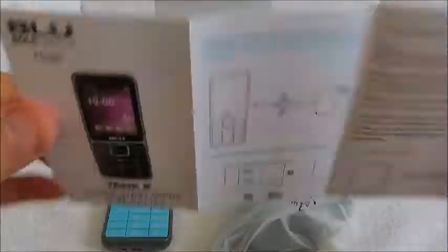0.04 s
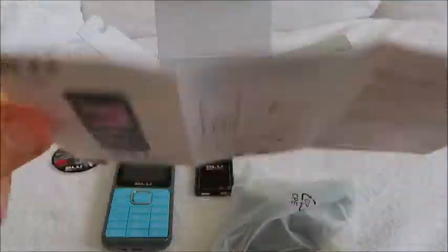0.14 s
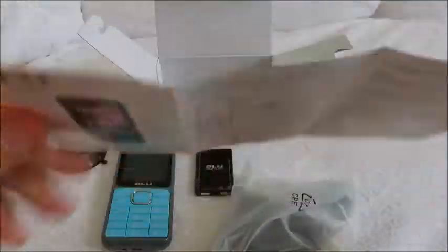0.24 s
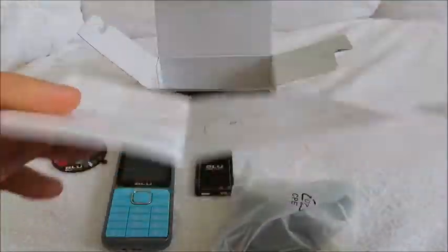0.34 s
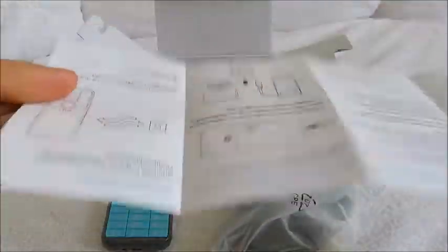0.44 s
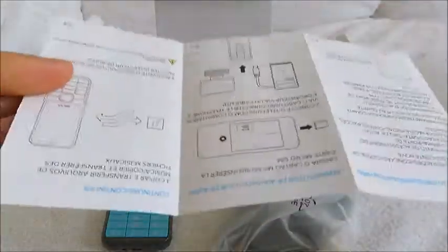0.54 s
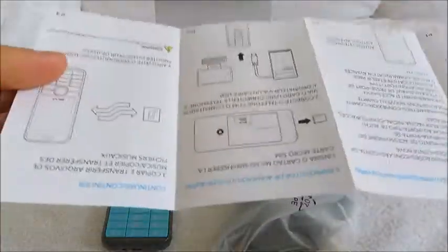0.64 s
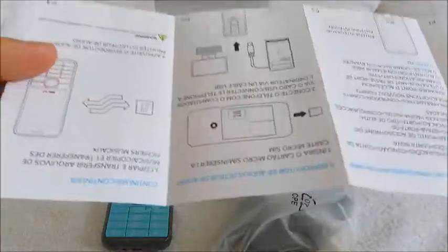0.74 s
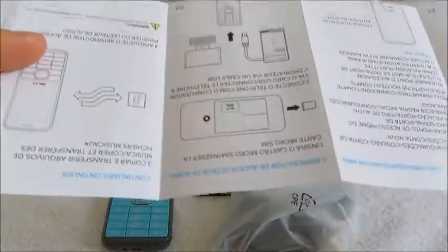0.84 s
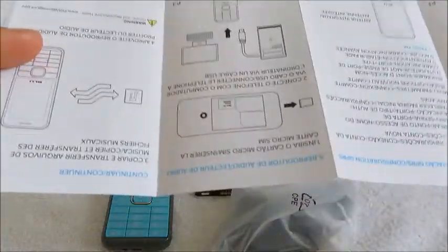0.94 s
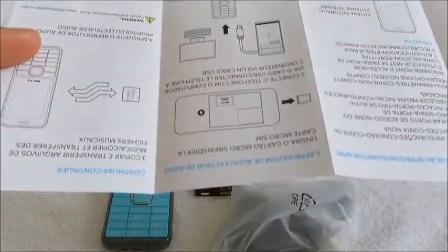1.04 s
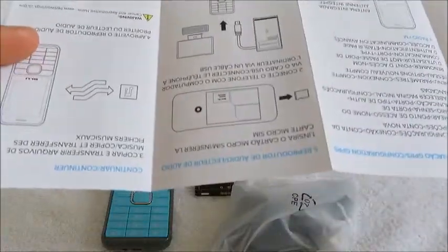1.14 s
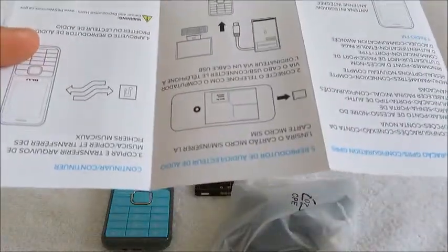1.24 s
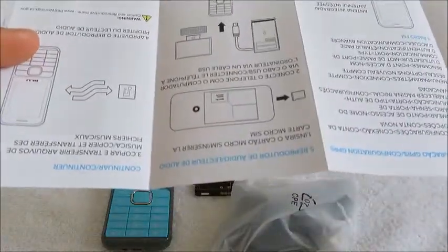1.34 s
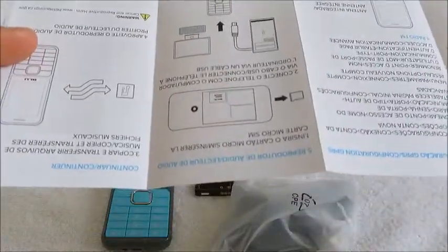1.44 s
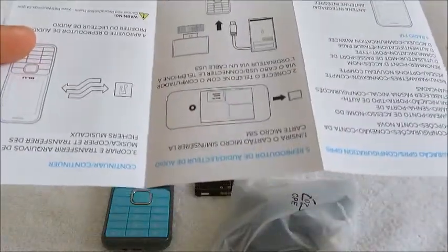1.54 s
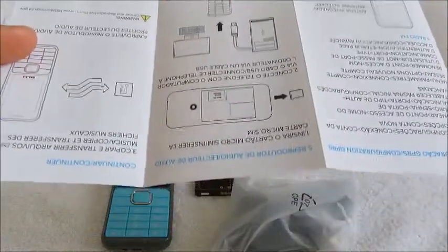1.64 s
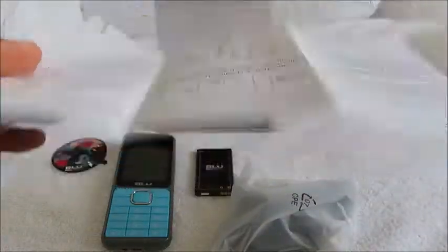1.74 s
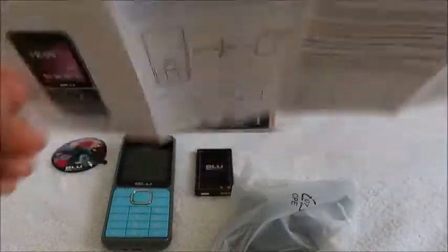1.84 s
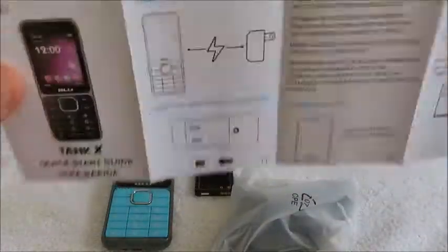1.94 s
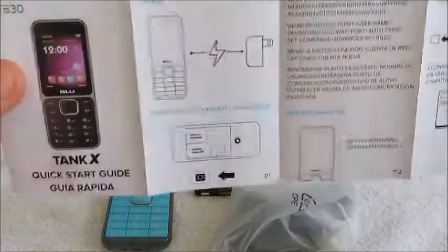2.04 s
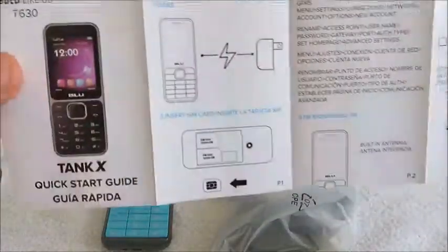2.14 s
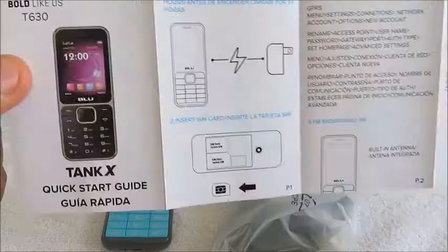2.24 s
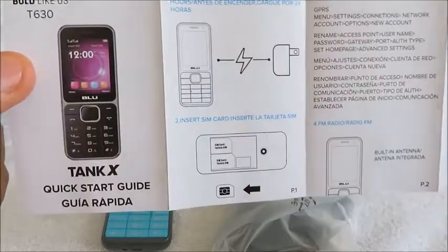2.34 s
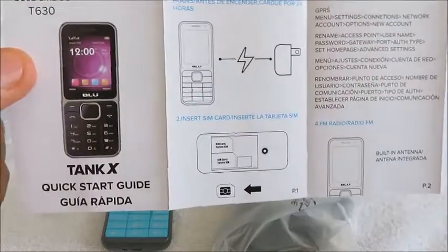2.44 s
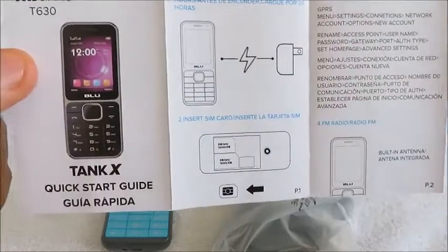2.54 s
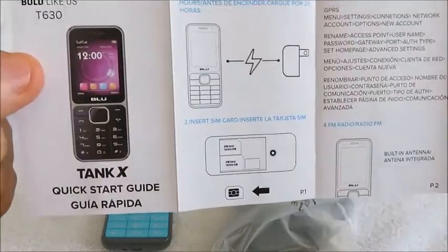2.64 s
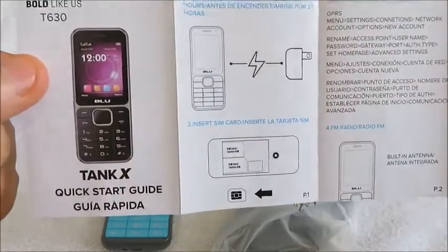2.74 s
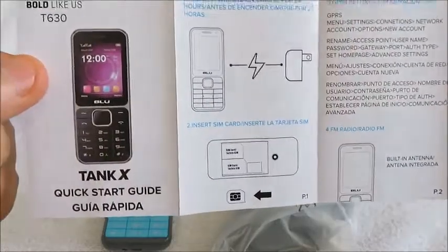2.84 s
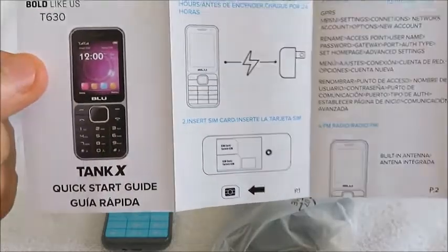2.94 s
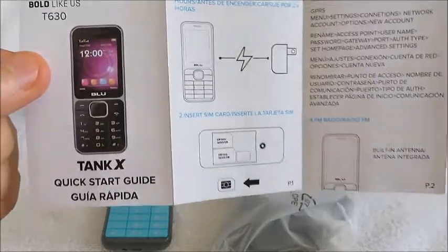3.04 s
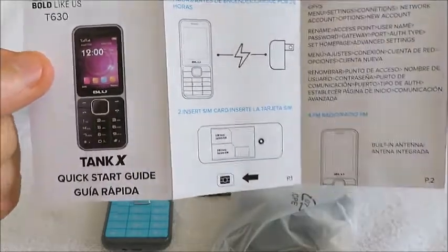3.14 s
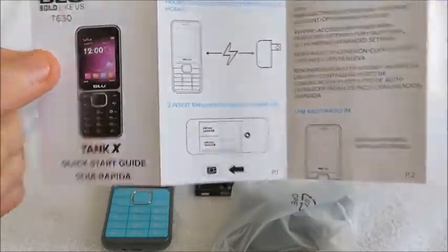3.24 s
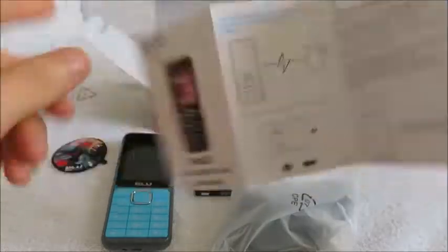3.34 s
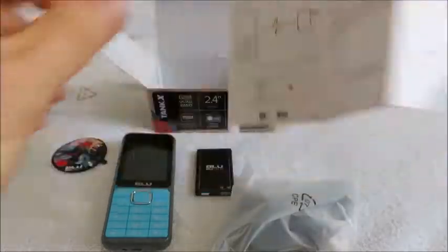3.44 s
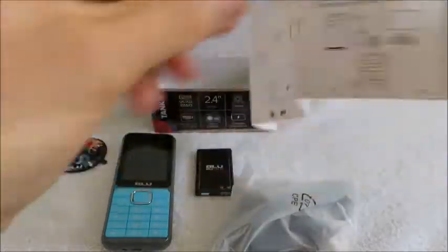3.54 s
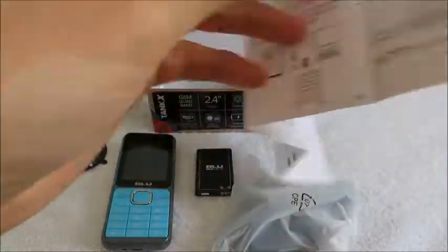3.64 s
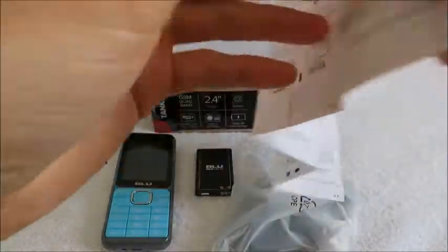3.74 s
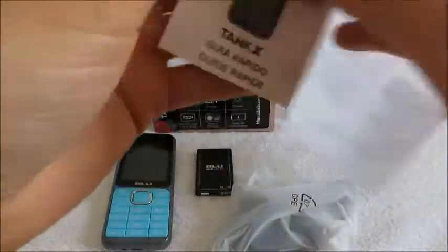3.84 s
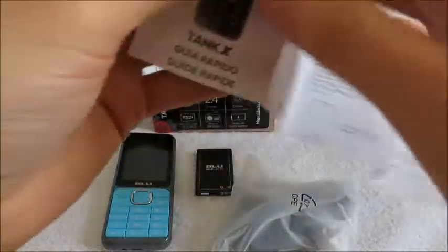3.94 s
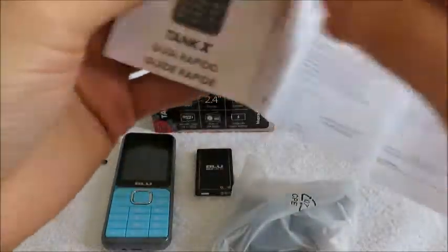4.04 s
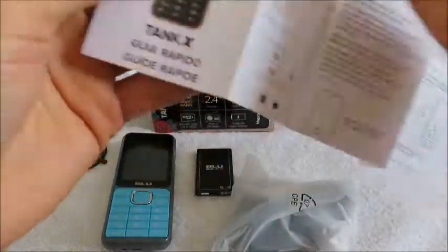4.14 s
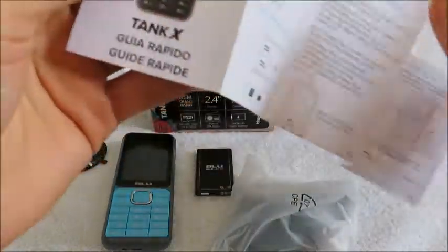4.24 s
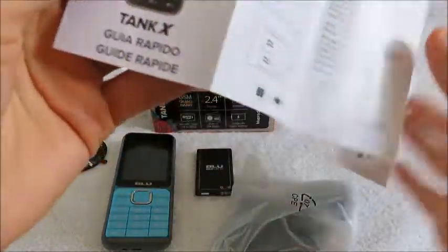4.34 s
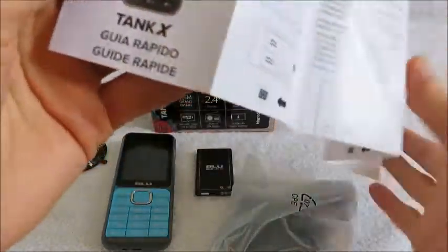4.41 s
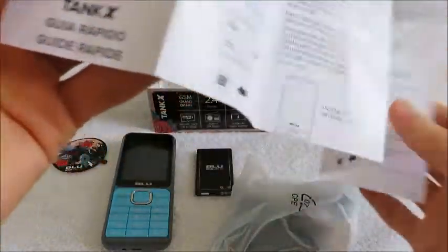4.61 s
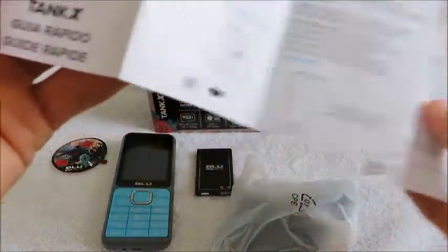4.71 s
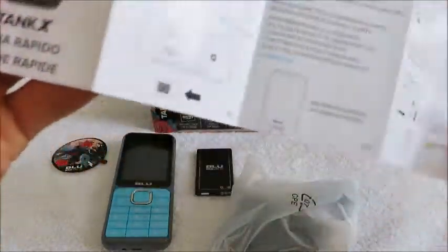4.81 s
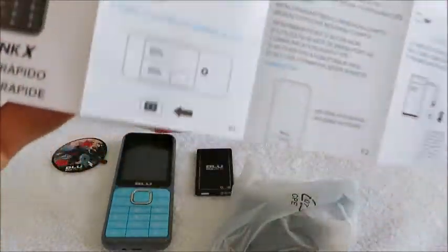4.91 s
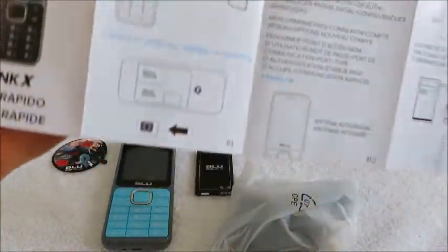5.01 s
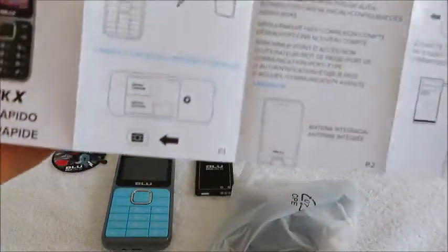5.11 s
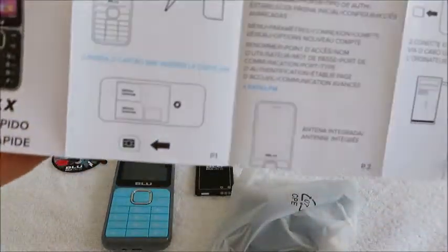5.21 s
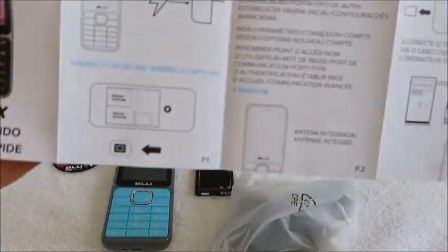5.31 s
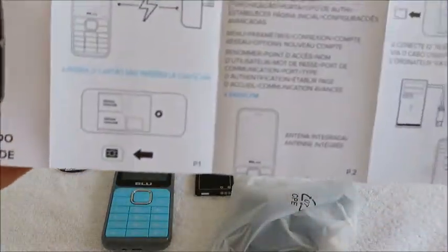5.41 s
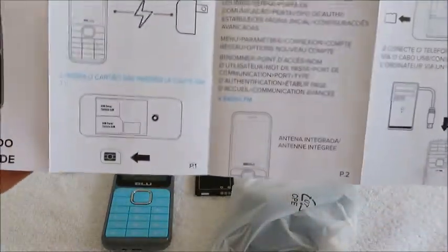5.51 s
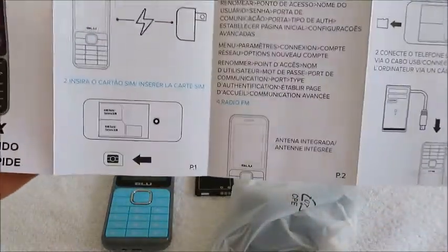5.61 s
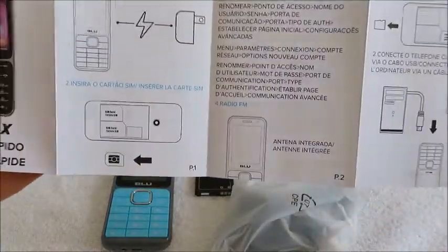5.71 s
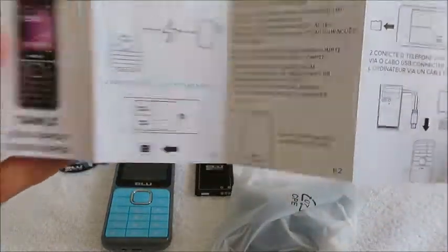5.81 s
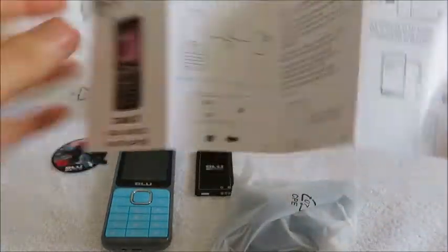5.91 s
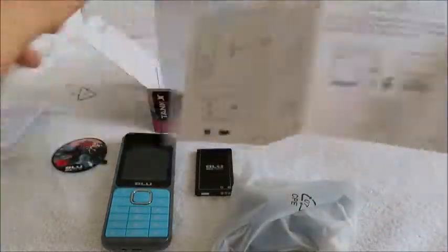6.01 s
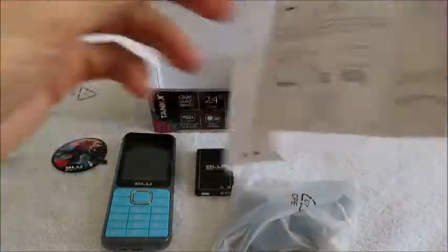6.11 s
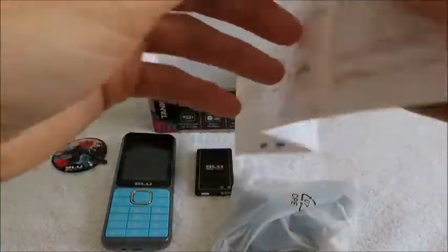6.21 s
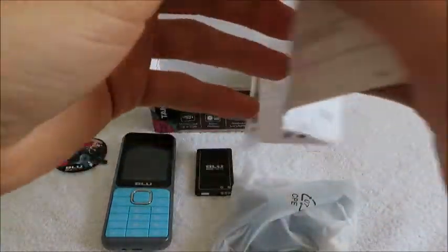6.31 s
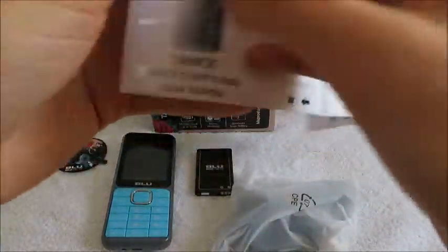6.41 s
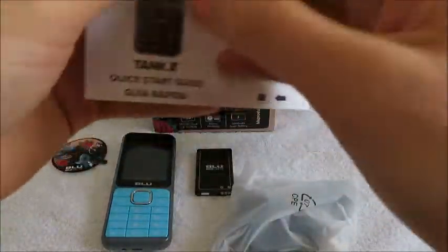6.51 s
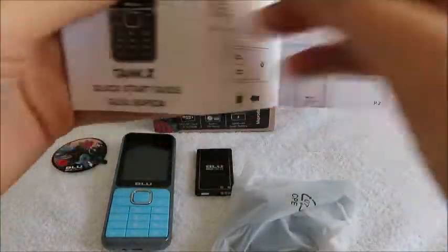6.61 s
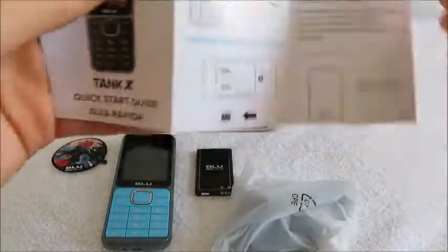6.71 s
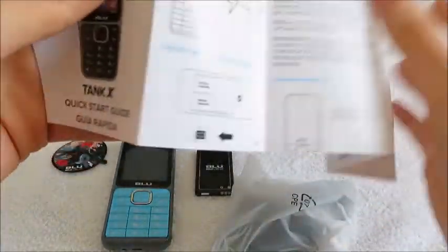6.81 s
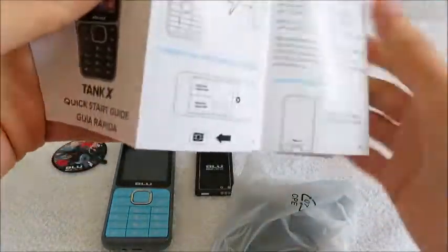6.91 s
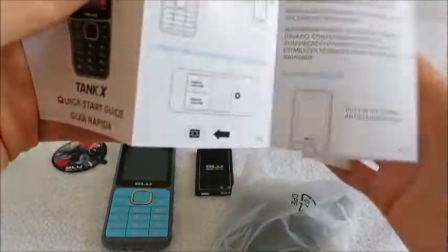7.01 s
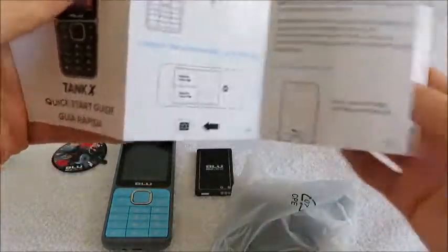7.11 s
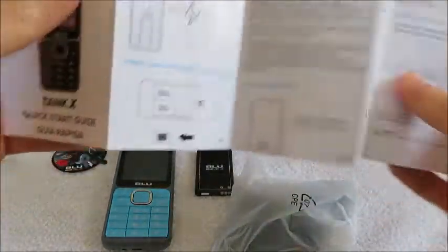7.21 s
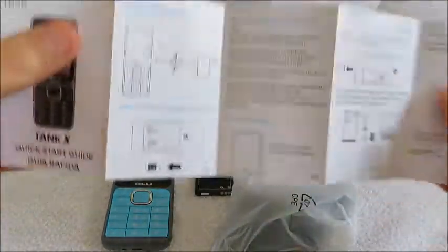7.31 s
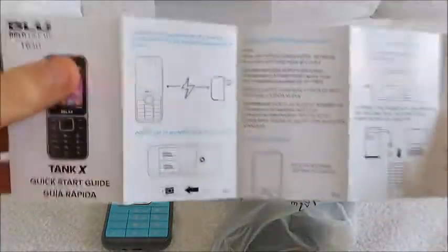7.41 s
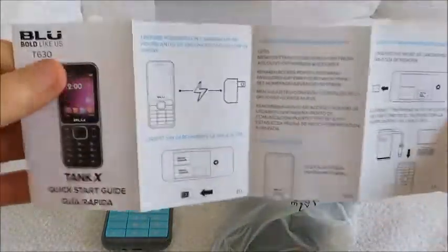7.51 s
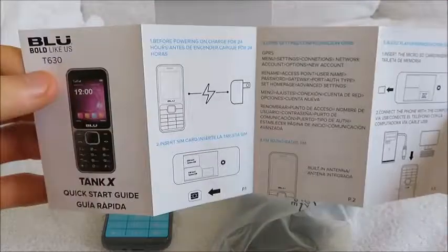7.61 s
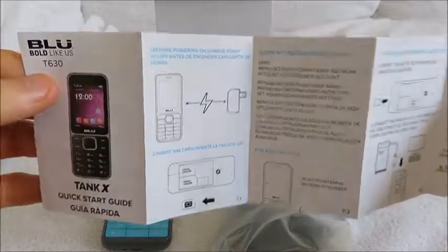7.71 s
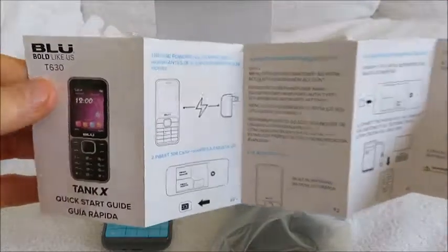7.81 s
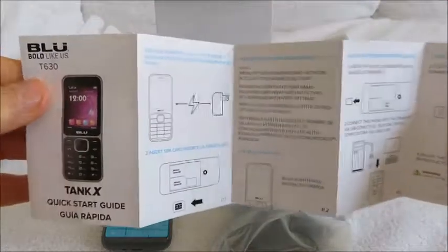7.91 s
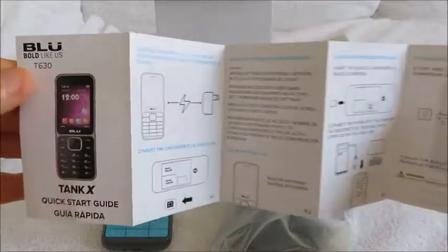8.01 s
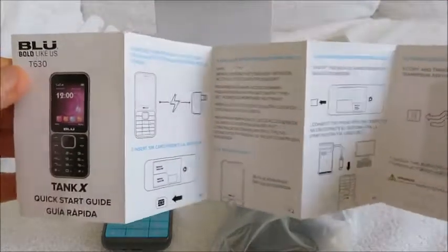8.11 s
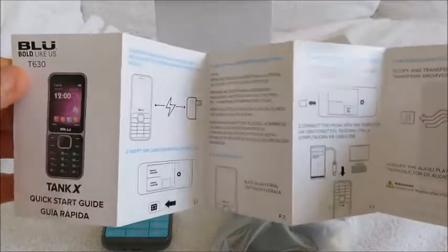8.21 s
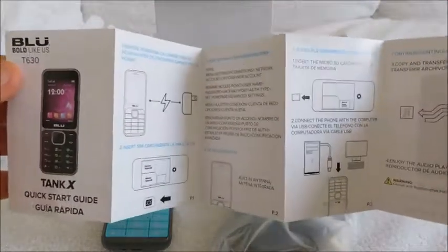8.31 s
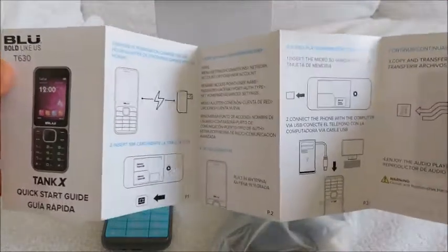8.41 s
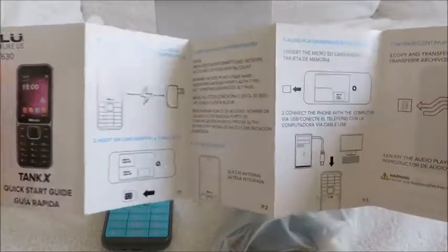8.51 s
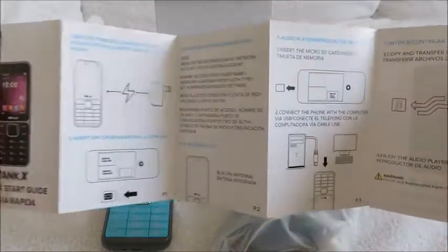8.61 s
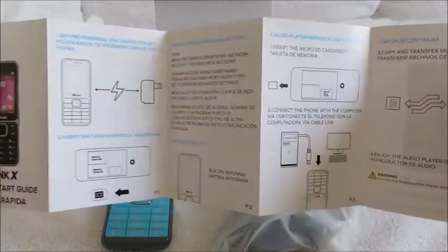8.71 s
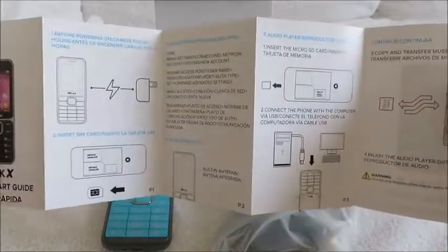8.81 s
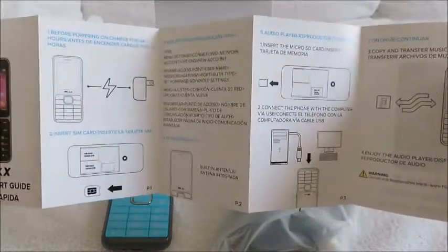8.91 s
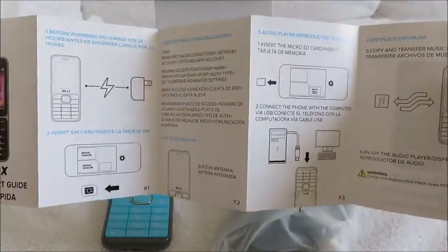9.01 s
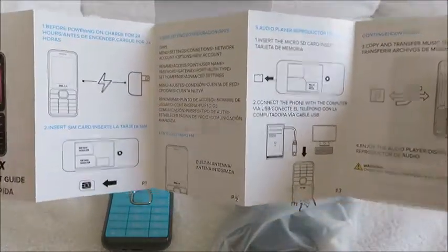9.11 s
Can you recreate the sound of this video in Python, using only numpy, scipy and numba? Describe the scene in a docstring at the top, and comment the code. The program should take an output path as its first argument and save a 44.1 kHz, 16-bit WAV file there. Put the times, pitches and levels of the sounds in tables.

```python
"""A stiff folded paper leaflet is flipped over and opened out close to a phone in a quiet room.
Over steady hiss, a room tail and short far trills, it starts with faint slides, snaps and soft flops of filtered noise.
Hard cracks come near 3.6 s; just after 6 s it knocks on something that rings in broad modes, amid the loudest snap.
Smaller flops, slides and low sways then thin out. The phone turns its gain down after the loudest snaps."""
import sys
import numpy as np
from scipy import signal
from scipy.fft import rfft, irfft, next_fast_len
from scipy.io import wavfile
from numba import njit

SR = 44100
rng = np.random.default_rng(int(sys.argv[2]) if len(sys.argv) > 2 else 0)


def wav_out(sig):
    """Save sig, one row per channel (or a flat mono array), as 16-bit PCM at SR to the path in sys.argv[1]."""
    wavfile.write(sys.argv[1], SR, np.round(np.clip(np.atleast_2d(sig).T, -1, 1) * 32767).astype(np.int16))


N = 403515
TIME = np.arange(N) / SR
BURST = 16384  # samples in each short sound
BURST_TIME = np.arange(BURST) / SR


def undb(db):
    """Decibels to gain."""
    return 10 ** (np.asarray(db) / 20)


def unit(x):
    """Scale to rms 1."""
    return x / np.sqrt(np.mean(x ** 2) + 1e-20)


def freqs(x):
    """Frequencies of the spectrum of x, kept at 1 Hz or above."""
    return np.maximum(np.fft.rfftfreq(x.shape[-1], 1 / SR), 1)


def shape(x, response):
    """Filter x by a function of frequency."""
    size = next_fast_len(x.shape[-1] // 2 + 1) * 2
    spectrum = rfft(x, size) * response(freqs(np.empty(size)))
    return irfft(spectrum, size)[..., :x.shape[-1]]


def add(track, s, sound):
    """Mix a sound in at a time in seconds."""
    start = int(s * SR)
    a, b = max(start, 0), min(start + len(sound), N)
    track[a:b] += sound[a - start:b - start]


def octaves(x):
    """Split x into overlapping octave bands that sum back to it; returns centres and bands."""
    centres = 62.5 * 2. ** np.arange(9)
    log_f = np.log(freqs(x))
    share = np.array([np.interp(log_f, np.log(centres), row) for row in np.eye(len(centres))])
    return centres, irfft(rfft(x) * share)


def decay_60(t, t60):
    """Exponential decay that falls 60 dB in t60 seconds."""
    return np.exp(-np.log(1000) * t / t60)


def grains(size, spread_db, per_s):
    """Fibres catch and slip: noise whose strength jumps from grain to grain."""
    strength = undb(spread_db * rng.standard_normal(size))
    grain_index = (np.arange(size) * (per_s / SR)).astype(int)
    return unit(rng.standard_normal(size) * strength[grain_index])


# resonances of the held sheet, added to its direct sound: (f/Hz, width/Hz, level/dB)
SHEET_MODES = [(648, 81, -4), (1075, 80, -42), (1700, 59, -46), (2750, 430, -9), (3430, 210, -11)]


def paper(x, low_hz, high_hz, modes=(), fall=0.31):
    """The sheet radiates: the size of the moving patch sets the low edge, its suddenness the high edge."""
    def response(f):
        lo, hi = 1j * f / low_hz, 1j * f / high_hz
        low_edge = lo ** 2 / (1 + np.sqrt(2) * lo + lo ** 2)
        high_edge = 1 / (1 + np.sqrt(2) * hi + hi ** 2) / (1 + hi) ** fall
        ringing = sum(undb(db) / (1 + 1j * hz / width * (f / hz - hz / f))
                      for hz, width, db in [*SHEET_MODES, *modes])
        return low_edge * high_edge * (1 + ringing)
    return unit(shape(x, response))


def buckle(db, low_hz, high_hz, t60, panel_hz, panel_db=0, panel_q=7, crack_db=-7, bass_lag=0.17,
           rise=0.0089, flutter_db=-21, flutter_t60=0.085):
    """A panel pops through: a crack, bending waves that die fastest in the treble, then a little flutter."""
    t = BURST_TIME
    centres, bands = octaves(grains(BURST, spread_db=2, per_s=1500))
    burst = 0
    for hz, band in zip(centres, bands):
        slow = (2000 / hz) ** bass_lag  # both t60 settings hold at 2 kHz
        ring = t60 * slow
        envelope = (1 - np.exp(-t / (rise * ring))) * decay_60(t, ring)
        flutter = (1 - np.exp(-t / 0.0013)) * decay_60(t, flutter_t60 * slow)
        envelope += undb(flutter_db) * flutter
        burst = burst + unit(band * envelope) * np.sqrt(hz)
    crack = unit(signal.unit_impulse(BURST, 12))
    # short snaps have the most crack, long flops hardly any
    burst = unit(burst) + undb(crack_db) * min(1, 0.014 / t60) * crack
    panel = (panel_hz, panel_hz / panel_q, panel_db)
    # level: the whole burst's energy as rms over 10 ms
    return paper(burst, low_hz, high_hz, [panel]) * undb(db) * np.sqrt(SR / 100 / BURST)


def air(centre_hz):
    """Low rumble of air pushed about by the sheet."""
    noise = rng.standard_normal(BURST)
    return unit(shape(noise, lambda f: 1 / (1 + (f / centre_hz - centre_hz / f) ** 2 / 2)))


def puff(db, air_db=-24.0, growth=0.54, centre_hz=62, octaves_per_db=0.06, decay_s=0.025):
    """The moving panel pushes air at the phone; the puff grows more slowly than the snap and deepens with it."""
    t = BURST_TIME
    rumble = air(centre_hz * 2 ** (-octaves_per_db * db)) * undb(growth * db + air_db)
    return rumble * (1 - np.exp(-t / 0.0033)) * np.exp(-t / decay_s)


# a dull flop rings for the crack's t60 plus the extra; above this suddenness the panel cracks and soon stills
CRACK_T60_S, FLOP_EXTRA_T60_S, CRACK_ABOVE_HZ, CRACK_STEEPNESS = 0.01, 0.053, 2720, 6
# a flop resonates a little above the centre of its band, a crack at the stiff crease
PANEL_RATIO, CREASE_HZ = 1.2, 2450


def snap(db, low_hz, high_hz):
    """One buckling panel and its puff; the more sudden, the shorter it rings and the more the crease sounds."""
    floppy = 1 / (1 + (high_hz / CRACK_ABOVE_HZ) ** CRACK_STEEPNESS)
    flop_hz = PANEL_RATIO * np.sqrt(low_hz * high_hz)
    panel_hz = flop_hz ** floppy * CREASE_HZ ** (1 - floppy)
    return buckle(db, low_hz, high_hz, CRACK_T60_S + FLOP_EXTRA_T60_S * floppy, panel_hz) + puff(db)


# a panel buckles or slaps: (t/s, level/dB of the buckle as rms over 10 ms, low edge f/Hz, high edge f/Hz)
PANEL_SNAPS = [(.217, -42, 238, 1000), (.328, -30, 235, 1350), (.418, -45.5, 200, 1890),
               (0.939, -49.5, 460, 2400), (1.782, -48, 150, 4300), (1.796, -35.5, 55, 1300),
               (1.995, -46.5, 80, 1500), (3.149, -47.5, 400, 3600), (3.200, -35, 189, 676),
               (3.263, -42, 300, 610), (3.550, -35, 80, 3360), (3.552, -21, 120, 1680),
               (3.5802, -11.5, 200, 4500), (3.582, -10, 416, 5850), (3.663, -42, 60, 2530),
               (3.702, -40, 80, 2640), (3.7386, -18.5, 1000, 5200), (3.7575, -10, 69.4, 3850),
               (3.884, -43.5, 80, 3700), (4.007, -44.5, 79, 3130), (4.211, -34.5, 302, 1940),
               (4.550, -43.5, 80, 4130), (4.556, -36, 75, 845), (4.598, -37.5, 80, 1390),
               (4.617, -31.5, 110, 1330), (4.647, -38, 80, 800), (5.236, -49.5, 80, 3400),
               (5.591, -33, 85.5, 710), (5.718, -36, 670, 1150), (5.848, -35.5, 110, 840),
               (6.074, -27.5, 80, 2280), (6.1277, -13, 80, 3650), (6.1495, -6.5, 170, 5700),
               (6.334, -20, 59.5, 2410), (6.388, -43, 150, 1500), (6.478, -29, 80, 3920),
               (6.48, -28, 50, 1690), (6.571, -37, 80, 2490), (6.829, -44.5, 200, 3500),
               (7.029, -46.5, 80, 2170), (7.056, -28.5, 172, 1850), (7.077, -39, 100, 1990),
               (7.206, -38, 200, 900), (7.227, -40, 150, 890), (7.274, -34.5, 260, 1180),
               (7.354, -42.5, 110, 600), (7.757, -50, 110, 350)]


def snaps():
    """The distinct snaps and flops of the panels, from dull slaps to sharp cracks."""
    out = np.zeros(N)
    for s, db, low_hz, high_hz in PANEL_SNAPS:
        add(out, s - .0004, snap(db, low_hz, high_hz))  # the burst starts just ahead of its listed time
    return out


# the leaflet knocks on something stiff:
# (t/s, level/dB of the tap as rms over 10 ms before its treble cut, tap t60/s at 2 kHz, ring level/dB before decay)
LEAFLET_KNOCKS = [(6.034, -15.5, 0.019, -27), (6.102, -15, 0.034, -40), (6.152, -44, .03, -28),
                  (6.222, -33.5, 0.096, -37.5)]
# what the knocked thing rings with: (f/Hz, width/Hz before sharpening, level/dB before the ring's treble roll-off)
KNOCKED_MODES = [(760, 55, -2), (1040, 100, -2), (1400, 110, -9.5), (1610, 84, 2), (2050, 80, -4),
                 (2530, 68, -10), (3030, 90, -5), (3260, 50, -1)]


def knocks(low_hz=950, high_hz=3150, main_hz=1070, click_db=-21, ring_t60=0.29, sharpness=2.2,
           ring_top_hz=2300):
    """A blunt tap with a thin click on top; the thing that was hit rings on unevenly in broad resonances."""
    out, t = np.zeros(N), BURST_TIME
    blunt = signal.butter(10, high_hz, fs=SR, output="sos")

    def body(f):
        modes = sum(undb(db) / (1 + (sharpness * (f - hz) / width) ** 2) for hz, width, db in KNOCKED_MODES)
        return modes / (1 + (f / ring_top_hz) ** 2)
    for s, db, t60, ring_db in LEAFLET_KNOCKS:
        tap = signal.sosfilt(blunt, buckle(db, low_hz, high_hz, t60, main_hz))
        click = buckle(db + click_db, low_hz=2500, high_hz=5400, t60=0.0136, panel_hz=5500)
        ring = unit(shape(rng.standard_normal(BURST), body)) * undb(ring_db)
        ring = ring * (1 - np.exp(-t / 0.0011)) * decay_60(t, ring_t60)
        add(out, s, tap + click + ring)
    return out


def crinkles(per_s, spread_db):
    """Lone fibres give way: sparse clicks of very different sizes."""
    hit = rng.random(BURST) < per_s / SR
    sign = rng.choice([-1, 1], BURST)
    return unit(hit * sign * undb(spread_db * rng.standard_normal(BURST)))


def swell(t, length):
    """A stroke of the hand speeds up and slows down; 1 in its middle, about half at the ends of its length."""
    return 1 / np.cosh(np.clip(2.68 * t / length, -20, 20))


# paper slides over paper or skin: (middle t/s, level/dB of the slips at the middle, low edge f/Hz, length t/s)
SLIDES = [(0.035, -36, 2430, 0.0059), (1.647, -51, 99, .04), (1.798, -48, 2500, 0.016),
          (3.176, -45.5, 100, 0.013), (3.366, -51.5, 2190, 0.035), (3.398, -38, 1900, 0.0075),
          (3.411, -34.5, 1710, 0.01), (3.742, -21.5, 5000, 0.0058), (3.75, -24.5, 200, 0.023),
          (3.935, -42.5, 80, 0.042), (4.259, -41.5, 1580, 0.018), (4.427, -47.5, 80, 0.033),
          (4.981, -58, 600, 0.37), (5.759, -46.5, 150, 0.028), (6.067, -42, 2500, 0.046),
          (6.31, -42.5, 2500, 0.072), (6.321, -25.5, 3360, 0.0042), (6.463, -47, 80.4, 0.067),
          (6.574, -35, 500, 0.018), (6.744, -44.5, 80, 0.029), (6.844, -51, 200, 0.054),
          (7.097, -47, 79.6, 0.13), (7.241, -56, 3160, 0.36), (8.074, -59, 200, 0.1)]
RUB_BAND_HZ = 4060  # high edge of a full-bodied slide; thin ones reach higher


def rubs(crinkle_db=-4, fizz_db=-12, fizz_hz=10000, air_db=-33, air_growth=0.55, air_hz=95, air_s=.03):
    """Each slide swells and fades as a stream of tiny slips and crinkles, while the sheet stirs the air."""
    out = np.zeros(N)
    t = (np.arange(BURST) - BURST // 2) / SR
    for s, db, low_hz, length in SLIDES:
        slips = grains(BURST, spread_db=3, per_s=900)
        # a brisk slide packs its crinkles closer together
        slips = slips + undb(crinkle_db) * crinkles(per_s=60 + 5 / length, spread_db=6.5)
        body = paper(slips, low_hz, np.hypot(low_hz, RUB_BAND_HZ))
        # the surface fibres fizz in the top treble
        fibres = grains(BURST, spread_db=0.5, per_s=460)
        fizz = unit(shape(fibres, lambda f: 1 / (1 + (fizz_hz / f) ** 6))) * undb(fizz_db)
        add(out, s + t[0], (body + fizz) * undb(db) * swell(t, length))
        add(out, s + t[0], air(air_hz) * undb(air_growth * db + air_db) / np.cosh(t / air_s))
    return out


# the hands turn, swing or spread the whole sheet: (middle t/s, sway level/dB, length t/s)
HAND_MOVES = [(0.779, -61, 0.19), (1.659, -51, 0.061), (1.849, -55, 0.17), (3.224, -54, .06),
              (3.442, -52, 0.084), (3.683, -58, .08), (3.867, -53, 0.088), (4.628, -41, 0.11),
              (4.896, -51.5, 0.24), (6.1, -37, 0.068), (6.5, -51, .05), (6.957, -53.5, .05),
              (7.08, -42.5, .07), (7.321, -47.5, 0.14), (7.629, -64, .05), (8.068, -61, 0.084)]


def sway(low_hz=45, high_hz=310, spread_db=4):
    """The whole sheet wobbles with a soft low rumble for as long as the hands move it."""
    motion = sum(undb(db) * swell(TIME - s, length) for s, db, length in HAND_MOVES)
    return motion * paper(grains(N, spread_db, per_s=77), low_hz, high_hz)


def small_flops(count=3, db=-36, growth=0.29, spread_db=2, low_hz=100, high_hz=850,
                spread_octaves=.55, scatter=.5):
    """Each move of the sheet shakes a few faint flops out of its folds, a little louder when it sways hard."""
    out = np.zeros(N)
    for s, sway_db, length in HAND_MOVES:
        for late, loud, bright in rng.standard_normal((count, 3)):
            flop_db = db + growth * sway_db + spread_db * loud
            flop = snap(flop_db, low_hz, high_hz * 2 ** (spread_octaves * bright))
            add(out, max(s + scatter * length * late, 0), flop)
    return out


def tremble(db=-66, spread_db=6):
    """Even when held still, the sheet trembles softly in the fingers."""
    return undb(db) * paper(grains(N, spread_db, per_s=60), low_hz=156, high_hz=886)


def room(x, wet_db=-19, t60=0.2, damping=0.017):
    """A small furnished room: a short diffuse tail, different at each microphone port."""
    t = BURST_TIME
    out = []
    for _ in range(2):
        centres, bands = octaves(rng.standard_normal(BURST))
        decay = decay_60(t, t60 * (2000 / centres[:, None]) ** damping)
        onset = np.clip((t - .003) / 0.0042, 0, 1)
        tail = (bands * decay).sum(axis=0) * onset
        out.append(signal.fftconvolve(x, unit(tail) / np.sqrt(BURST))[:N])
    return undb(wet_db) * np.array(out)


# faint distant trills: (start t/s, end t/s)
TRILL_RUNS = [(.418, .78), (1.321, 1.7), (1.989, 2.52), (4.395, 4.75), (5.457, 5.9), (7.33, 7.63),
              (8.031, 8.46)]
TRILL_DB = -58  # typical rms at the top of a pulse


def trills(pitch_hz=950, period_s=.034, pulse_s=0.0056):
    """Something far off, perhaps a frog, trills in short runs of soft, uneven sine pulses."""
    out, t = np.zeros(N), np.arange(-1024, 1024) / SR
    for start, end in TRILL_RUNS:
        chance = rng.standard_normal((32, 3))  # at most 32 pulses a run
        for s, (late, tune, loud) in zip(np.arange(start, end, period_s), chance):
            tone = np.sin(2 * np.pi * pitch_hz * (1 + 0.029 * tune) * t)
            pulse = tone * np.exp(-(t / pulse_s) ** 2 / 2)
            add(out, s + t[0] + 0.00206 * late, pulse * undb(TRILL_DB + 2.9 * loud) * np.sqrt(2))
    return out


# spectrum of the quiet room and microphone hiss: (f/Hz, relative level/dB per Hz)
HISS_SPECTRUM = [(15, -7), (25, -3.5), (69, 0.5), (101, -8.5), (198, -7), (240, -10), (267, -8), (378, -11),
                 (410, -11), (469, -10.5), (648, -17), (945, -15), (1200, -16), (4870, -25), (15500, -38.5)]
HISS_DB = -53  # rms of the shared part


def background(side_db=-1, shared_below_hz=190, dull_hz=15000):
    """Hiss that is largely separate at each port, over a rumble that is shared."""
    hz, db = np.transpose(HISS_SPECTRUM)

    def colour(f):
        return undb(np.interp(np.log(f), np.log(hz), db)) / (1 + (f / dull_hz) ** 6)
    mid, side = (unit(shape(rng.standard_normal(N), colour)) for _ in range(2))
    side = undb(side_db) * shape(side, lambda f: 1 / np.sqrt(1 + (shared_below_hz / f) ** 4))
    return undb(HISS_DB) * np.array([mid + side, mid - side])


PORT_LAG_SAMPLES = .8  # the left port hears the leaflet this much later


def scene(pan_db=-0.5):
    """The leaflet is slightly nearer the right port; its bass is too local to stir the room."""
    leaflet = snaps() + knocks() + rubs() + sway() + small_flops() + tremble()

    def tilt(f, db):
        return undb(db / 2 * f / (f + 900))  # the level offset grows towards the treble
    left = shape(leaflet, lambda f: np.exp(-2j * np.pi * f * PORT_LAG_SAMPLES / SR) * tilt(f, pan_db))
    right = shape(leaflet, lambda f: tilt(f, -pan_db))
    reverb = room(shape(leaflet, lambda f: 1j * f / (1j * f + 160)))
    return np.array([left, right]) + reverb + trills() + background()


@njit
def follow(x, attack, release):
    """Level follower that rises quickly and sinks slowly."""
    out, e = np.empty(len(x)), 0.
    for i in range(len(x)):
        e += (x[i] - e) * (attack if x[i] > e else release)
        out[i] = e
    return out


DUCK_KNEE, TOP_HZ = .042, 15600  # followed level around which the gain sinks; top of the phone's band


def record(dry, depth_db=3.5, attack_s=0.0052, release_s=0.19):
    """Gain control ducks after loud snaps; peaks are rounded and the top is cut."""
    loudness = follow(np.abs(dry).mean(axis=0), 1 / (attack_s * SR), 1 / (release_s * SR))
    ducked = dry * undb(-depth_db * np.tanh((loudness / DUCK_KNEE) ** 2))
    rounded = ducked / (1 + ducked ** 6) ** (1 / 6)
    top_cut = signal.ellip(8, .2, 70, TOP_HZ, fs=SR, output="sos")
    return signal.sosfilt(top_cut, rounded)


dry = scene()
out = record(dry)
wav_out(out)
```